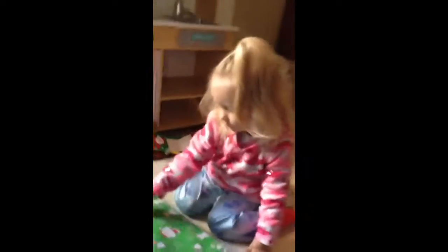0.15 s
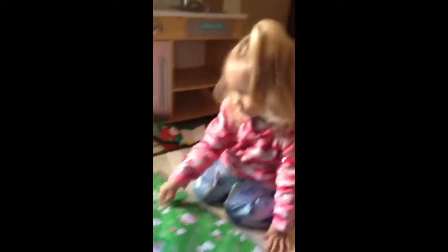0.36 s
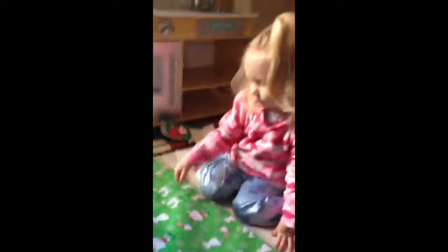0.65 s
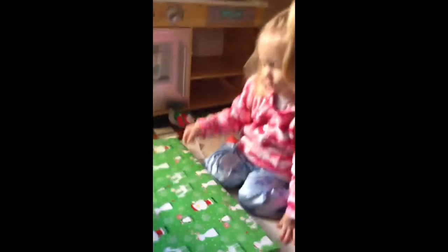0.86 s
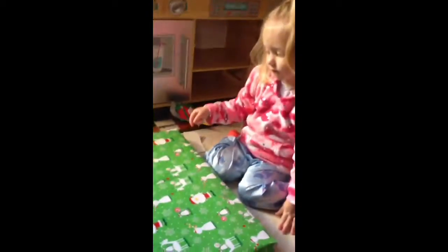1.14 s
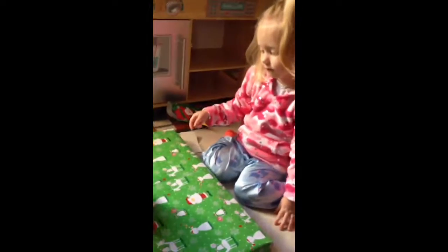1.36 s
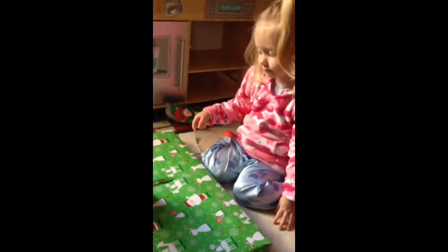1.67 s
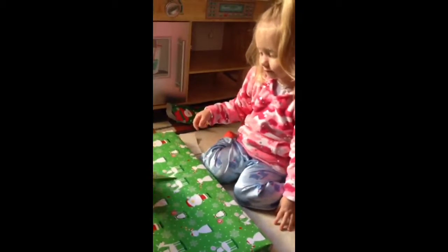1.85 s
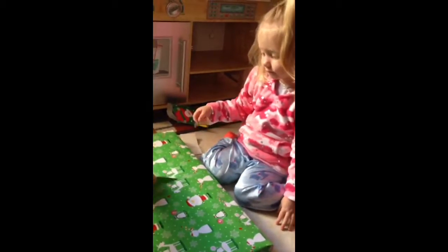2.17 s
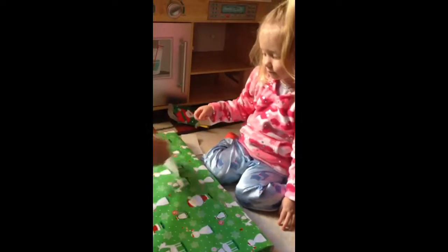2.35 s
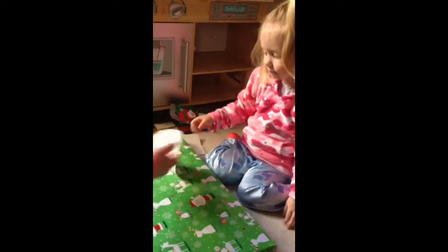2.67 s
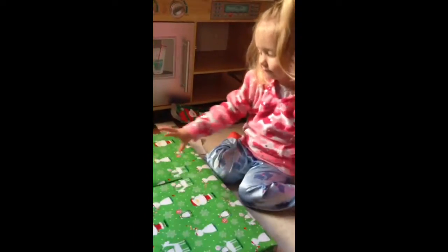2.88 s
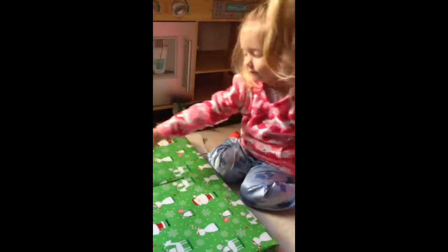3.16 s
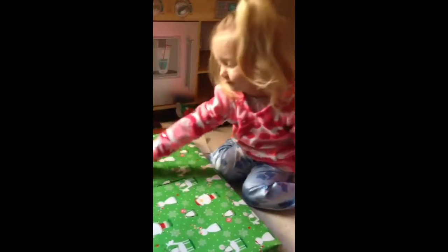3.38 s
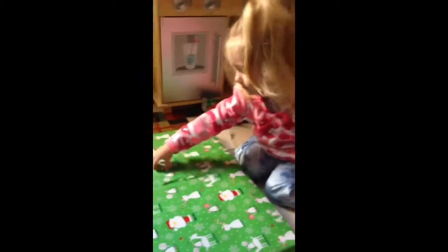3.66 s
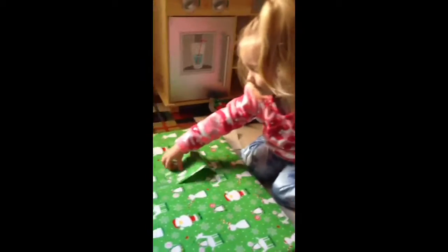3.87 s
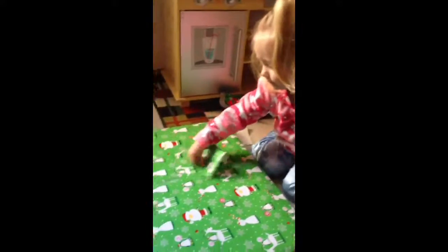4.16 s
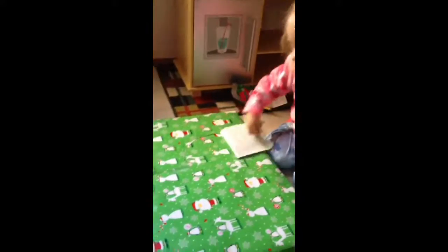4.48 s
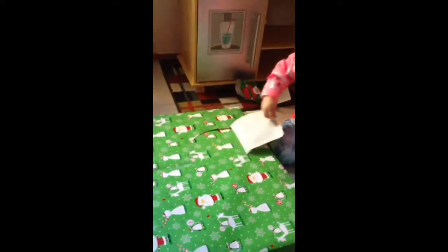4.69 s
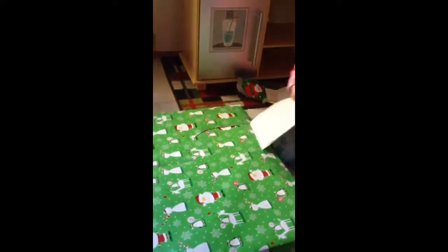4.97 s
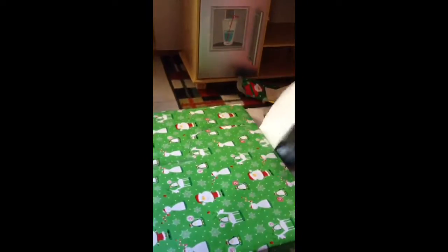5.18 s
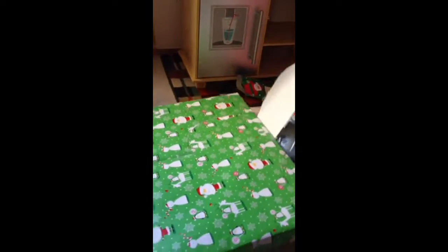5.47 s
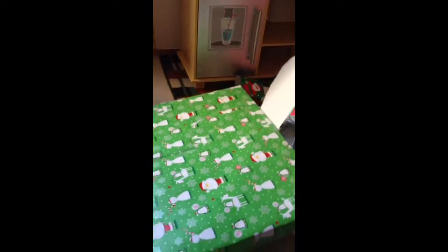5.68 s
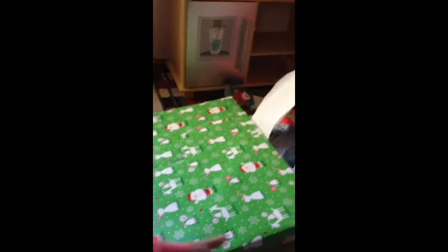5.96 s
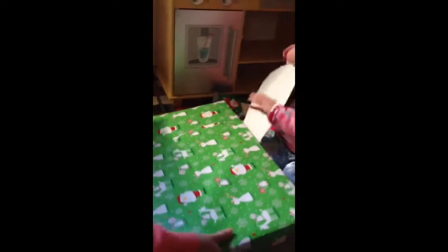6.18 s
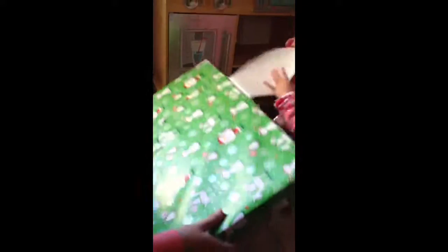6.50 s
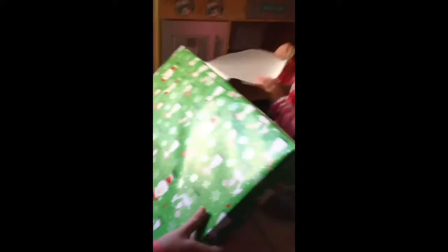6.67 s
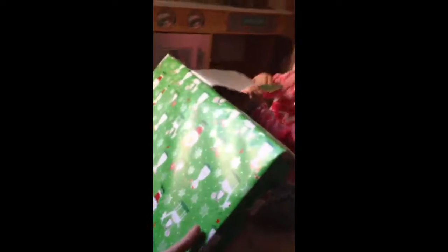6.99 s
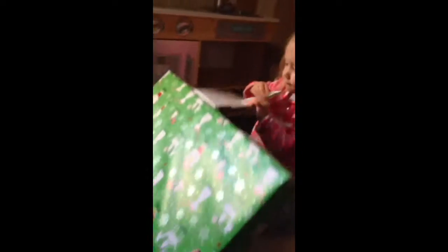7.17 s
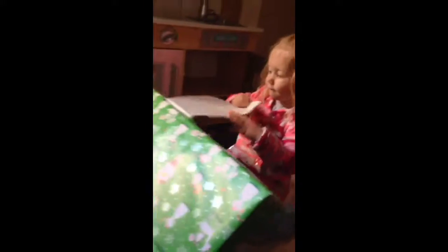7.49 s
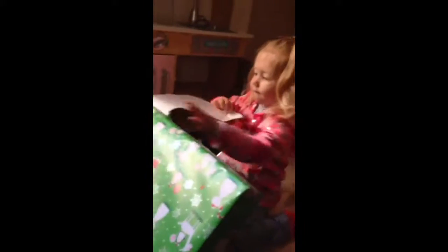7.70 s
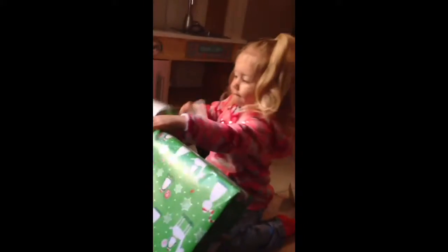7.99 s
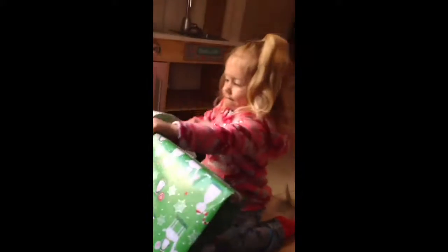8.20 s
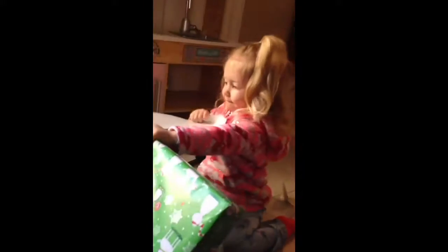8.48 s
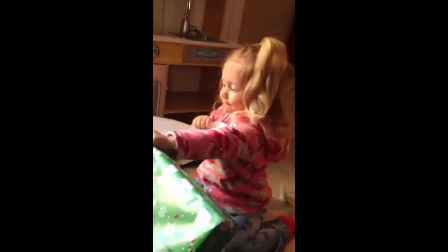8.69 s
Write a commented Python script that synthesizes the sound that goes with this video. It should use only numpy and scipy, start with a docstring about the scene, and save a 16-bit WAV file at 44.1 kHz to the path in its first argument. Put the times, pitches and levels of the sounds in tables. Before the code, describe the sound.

A close, dry mono sound in a small furnished room with faint steady noise. From 0 s, soft paper rustle and a few small creases; at about 0.8 s a hand shoves the box, a dull hollow boom with a knock and a papery scuff. Softer knock at 1.3 s. At 1.8 s a bump and a quick bright rip, a tiny tug or two near 2.15 s, then a second fuller rip from 2.2 to 2.5 s. Quiet brushing and faint taps from 2.7 to 4.3 s. At 4.4 s creases click, then the loudest event: a slow, jerky tear to about 5.1 s, with hard sharp snaps near 4.6, 4.9 and 5.0 s. A crease pops at 5.2 s and it calms. From 6 to 8.8 s the box tilts: irregular crinkling clicks, gentle sliding rustle and muffled low bumps, busier around 6.1-6.4, 7.1 and 8.3-8.7 s.

```python
"""Unwrapping a big gift box

Wrapping paper is pulled off a big cardboard box in a living room, close to a mono microphone.
Hands slide over the box: shaped grain noise makes its boom, the rustle and the hiss; ringing modes make soft knocks.
The sheet rips in three pulls, dense noise grains for breaking fibres, the last with hard snaps where it gives way.
Creases flip in decaying volleys of clicks, most of all as the loose flap crinkles while the box is tilted."""
import sys
import numpy as np
from scipy import signal
from scipy.fft import rfft, irfft, next_fast_len
from scipy.io import wavfile
from scipy.ndimage import uniform_filter1d, map_coordinates

SR = 44100
rng = np.random.default_rng(int(sys.argv[2]) if len(sys.argv) > 2 else 0)


def unload_wav(signal):
    """Save mono or channel-first audio to the path in sys.argv[1] as 16-bit WAV at rate SR, clipped to [-1, 1]."""
    wavfile.write(
        sys.argv[1],
        SR,
        np.round(np.clip(np.atleast_2d(signal).T, -1, 1) * 32767).astype(np.int16),
    )


N = 389844

# the taut sheet gives way in jerks: [t/s, length/s, peak level/dB]
JERK_TIMES = [(4.5723, 0.0072, -0.5), (4.617, .001, -8.5), (4.756, .001, -14.5), (4.8085, .001, -15),
              (4.8325, .001, -7), (4.8794, 0.039, -0.5), (4.9365, 0.0057, -5), (5.0016, 0.03, -2.5)]
JERK_FADE_DB = 4  # loss over the length of a jerk


def amp(db):
    """Decibels to gain."""
    return 10 ** (np.asarray(db) / 20)


def unit(x):
    """Scale to rms 1."""
    return x / np.sqrt(np.mean(x ** 2) + 1e-20)


def along(points, hz):
    """Read (Hz, value) points on a log frequency axis."""
    f, v = np.transpose(points)
    return np.interp(np.log(hz + 1), np.log(f + 1), v)


def filtered(x, response):
    """Multiply the spectrum of x by a response of frequency."""
    m = next_fast_len(N + SR // 2)
    return irfft(rfft(x, m) * response(np.fft.rfftfreq(m, 1 / SR)), m)[:N]


def coloured(x, spectrum):
    """Shape x by a spectrum and scale it to rms 1."""
    return unit(filtered(x, lambda hz: amp(along(spectrum, hz))))


def click(level_db, size=2048):
    """The sharpest causal (minimum-phase) pulse whose spectrum is level_db(Hz)."""
    cepstrum = irfft(np.log(amp(level_db(np.fft.rfftfreq(size, 1 / SR)))))
    cepstrum[1:size // 2] *= 2
    cepstrum[size // 2 + 1:] = 0
    return irfft(np.exp(rfft(cepstrum)))


def add(track, s, sound, db, measure=lambda x: np.abs(x).max()):
    """Mix a sound into the track at a time and a level (its peak, unless measured otherwise)."""
    start = max(round(s * SR), 0)
    part = track[start:start + len(sound)]
    part += (amp(db) * sound / measure(sound))[:len(part)]


def wobble(rate):
    """A smooth random curve, rate knots a second."""
    knots = rng.standard_normal(int(N * rate / SR) + 4)
    return map_coordinates(knots, [np.arange(N) * rate / SR])


def unsteady(depth_db, rate):
    """The uneven pressure of a hand, as a gain."""
    return amp(depth_db * wobble(rate))


def grains(rate, spread_db, clump_db, clump_rate):
    """Tiny impulses of uneven size, about rate a second, whose level wanders so that they seem to clump."""
    sizes = amp(spread_db * np.minimum(rng.exponential(size=N), 4)) * rng.choice([-1, 1], N)
    return sizes * (rng.random(N) < rate / SR) * amp(clump_db * wobble(clump_rate))


def facet(depth_db, count=45):
    """Random resonances of one facet of the sheet, as (Hz, dB) points."""
    return np.transpose([np.geomspace(300, 16000, count), depth_db * rng.standard_normal(count)])


def flexing(x, depth_db, size=384):
    """The bending sheet keeps changing its resonances, a few hundred Hz wide and some 30 ms long."""
    z = signal.stft(x, nperseg=size)[2]
    field = uniform_filter1d(rng.standard_normal(z.shape), size=3, axis=0)
    field = uniform_filter1d(field, size=7, axis=1)
    return signal.istft(z * amp(depth_db * unit(field)), nperseg=size)[1][:N]


def room_noise(level_db=-66.5):
    """The faint steady noise of the room, shaped from white noise."""
    # noise spectrum: [f/Hz, level/dB per Hz]
    quiet_spectrum = [(25, -24.5), (80, -18), (115, -3), (180, -4), (380, 4), (600, -3.5), (1500, -8.5),
                      (4000, -11), (8000, -15.5), (11000, -22), (15500, -17)]
    return amp(level_db) * coloured(rng.standard_normal(N), quiet_spectrum)


def room(x, wet_db, count=4, size=2205):
    """The direct sound plus the walls' answer, whose treble dies first; random tails take turns to vary its detail."""
    # reverberation of the room: [f/Hz, t60/s]
    decay_times = [(150, 0.36), (1000, 0.45), (3000, 0.31), (7000, 0.3), (15000, 0.26)]
    hz, t, z = signal.stft(rng.standard_normal((count, SR // 2)), SR, nperseg=256)
    decay = amp(-60 * t / along(decay_times, hz)[:, None])
    tails = signal.istft(z * decay, SR, nperseg=256)[1]
    tails /= np.linalg.norm(tails, axis=1, keepdims=True)
    tails = np.pad(tails, ((0, 0), (SR // 200, 0)))  # the answer comes 5 ms late
    # the tails take turns of size samples, crossfaded
    turn = np.arange(N) // size % count == np.arange(count)[:, None]
    shares = np.sqrt(np.abs(uniform_filter1d(turn.astype(float), size=size // 2, axis=1)))
    return x + amp(wet_db) * signal.oaconvolve(x * shares, tails, axes=1)[:, :N].sum(axis=0)


def knocking(vary_db=2, attack_s=0.0019, low_cut_hz=108):
    """A hand or knee bumps the box; its panels ring briefly, at new strengths each time."""
    # soft knocks on the box: [t/s, peak level before the low cut/dB]
    knocks = [(0.564, -44), (.812, -27.5), (1.294, -33), (1.805, -34), (3.406, -46), (3.454, -44.5),
              (3.57, -47), (3.683, -43), (5.404, -45.5), (6.056, -47), (7.218, -40.5), (8.284, -38),
              (8.651, -37)]
    # cardboard panel modes: [f/Hz, level/dB, t60/s]
    panel_modes = [(171.4, 0.5, 0.11), (219.6, 0, 0.13), (272, -4, 0.064), (354, -1, 0.13),
                   (453.5, -2, 0.12), (495, -8, 0.11), (658, -13, 0.071)]
    track, t = np.zeros(N), np.arange(SR // 4) / SR
    for s, db in knocks:
        ring = np.zeros(len(t))
        for hz, level, t60 in panel_modes:
            decay = amp(level + rng.normal(0, vary_db) - 60 * t / t60)
            ring += decay * np.sin(2 * np.pi * hz * t + rng.uniform(0, 2 * np.pi))
        add(track, s, ring * (1 - np.exp(-t / attack_s)), db)
    # the box radiates little bass
    return signal.sosfilt(signal.butter(2, low_cut_hz, "high", fs=SR, output="sos"), track)


def stroke_gains(swell_db=20):
    """Boom, rustle and hiss of all strokes: each climbs swell_db in its rise and sinks as far in its fall."""
    # strokes of hands and flap over the box:
    # [t at the fastest/s, rise/s, fall/s, box boom level/dB, rustle level/dB, hiss level/dB]
    stroke_rows = [(.115, 0.21, 0.32, -52.5, -55, -60.5), (0.579, 0.15, 0.19, -50, -58.5, -66),
                   (.8, 0.19, 0.092, -46, -44.5, -42.5), (0.823, 0.059, 0.13, -29.5, -32.5, -51),
                   (1.38, 0.4, 0.16, -52, -59, -63.5), (1.64, .3, 0.51, -54.5, -60, -66.5),
                   (1.812, 0.032, 0.063, -36, -55, -63), (2.58, 0.13, 0.12, -55.5, -58, -72),
                   (2.719, 0.12, 0.059, -55.5, -69, -66), (2.97, 0.78, 0.37, -77, -83, -67),
                   (3.41, 0.12, 0.18, -56.5, -64, -63), (3.619, 0.081, 0.24, -57, -54, -54),
                   (3.77, 0.15, 0.12, -77, -77, -58.5), (3.89, 0.12, .12, -67, -71, -56),
                   (4.085, 0.093, 0.11, -64, -59.5, -60), (4.255, 0.12, 0.15, -61.5, -61.5, -50.5),
                   (5.224, 0.06, 0.38, -59.5, -56, -57), (5.6, .4, 0.4, -60.5, -66.5, -64.5),
                   (5.825, .03, 0.094, -58.5, -63, -64), (6.15, 0.18, 0.37, -50, -50, -53),
                   (6.39, 0.22, 0.37, -46, -49, -54.5), (6.78, .22, 0.35, -57.5, -55, -57.5),
                   (7.01, 0.14, 0.22, -55.5, -55.5, -58), (7.16, 0.17, 1, -50.5, -52, -54.5),
                   (7.42, 0.13, 0.16, -61, -58, -68), (7.82, .17, 0.19, -54, -52.5, -63),
                   (7.94, 0.24, 0.24, -56.5, -52.5, -53), (8.17, 0.24, 0.66, -56.5, -56.5, -61.5),
                   (8.299, 0.086, 0.18, -47.5, -48.5, -49), (8.52, 0.091, 0.13, -48.5, -45.5, -49),
                   (8.664, 0.2, 0.23, -50, -48, -50)]
    t, power = np.arange(N) / SR, np.zeros((3, N))
    for s, rise, fall, *levels_db in stroke_rows:
        away = np.maximum((s - t) / rise, (t - s) / fall)
        near = away < 3
        power[:, near] += np.outer(amp(levels_db), amp(-swell_db * away[near])) ** 2
    return np.sqrt(power)


def sliding(strokes, whump_db=22, steepness=1.81):
    """Stick and slip of paper on cardboard: the box booms, the sheet rustles, its surface hisses."""
    # spectrum of the box boom: [f/Hz, level/dB per Hz]
    boom_spectrum = [(30, -59), (60, -32), (100, -20), (150, -4.5), (250, 1.5), (450, -0.5), (600, -8.5),
                     (720, -5.5), (1100, -14), (2500, -43)]
    # spectrum of the rustling sheet: [f/Hz, level/dB per Hz]
    rustle_spectrum = [(60, -62.5), (500, 6.5), (800, 1.5), (1400, 3.5), (2200, 0), (4400, -5.5),
                       (5500, -18), (10000, -37)]
    # spectrum of the paper surface: [f/Hz, level/dB per Hz]
    hiss_spectrum = [(200, -73), (1500, -11), (3500, -1.5), (4800, -2), (7500, -2), (10000, -10.5),
                     (15500, -15.5)]
    # spectrum of the box's upper panel modes: [f/Hz, level/dB per Hz]
    whump_spectrum = [(200, -27), (560, -14), (680, 3), (820, -6), (950, -3), (1150, -9.5), (1700, -13),
                      (3000, -44)]
    boom, rustle, hiss = strokes
    drag = grains(rate=6000, spread_db=2.5, clump_db=3.24, clump_rate=90)
    slips = flexing(grains(rate=2600, spread_db=2.5, clump_db=1.5, clump_rate=130), depth_db=5.5)
    fine = flexing(grains(rate=5500, spread_db=2.5, clump_db=1.0, clump_rate=91), depth_db=2.0)
    # only a hard shove wakes the upper panel modes
    whump = amp(whump_db) * boom ** steepness * coloured(rng.standard_normal(N), whump_spectrum)
    friction = boom * coloured(drag, boom_spectrum)
    friction += rustle * coloured(slips, rustle_spectrum)
    friction += hiss * coloured(fine, hiss_spectrum)
    return whump + unsteady(depth_db=1.35, rate=27) * friction


def small_creases(rustle, count=300, per_s=16, pop_db=8.5, edge_db=-8.5):
    """Little creases flip at random moments, louder the harder the sheet is handled."""
    start, chance = rng.integers(N, size=count), rng.random(count)
    rustle_db = 20 * np.log10(rustle[start] + 1e-9)
    db = rustle_db - 0.5 + rng.uniform(-7.0, 4.325, count)
    flips = chance < per_s * N / SR / count
    return [(i / SR, level, pop_db, edge_db) for i, level in zip(start[flips], db[flips])]


def crinkling(rustle, buckle_t60=.019, settle_db=-25, settle_t60=0.088, ragged_db=3.2,
              rebound_s=.011, rebound_db=-10):
    """A crease flips in a quick volley of clicks, rebounds and settles; wide folds pop low, tight ones are bright."""
    # large creases buckling: [t/s, rms level as if over 10 ms/dB, relative low pop/dB, relative bright edge/dB]
    large_creases = [(0.104, -56, 10, -7), (0.341, -51.5, 9, -11), (0.56, -51.5, 6, -1),
                     (0.7845, -34, -1, -8), (1.2975, -46.5, 17, -7), (1.7715, -40, 3.5, 12),
                     (1.7872, -30.5, -8.5, 0), (1.8126, -27.5, 9, 3.5), (1.875, -31.5, -1, -3),
                     (2.158, -46, -8, 1.5), (2.189, -34, -17, 2), (2.712, -53, 10, -1), (3.601, -50, 4, -4),
                     (3.697, -49.0, -3, -11.5), (3.746, -53, -10, 5.5), (4.1393, -56, -8, 11),
                     (4.372, -32.5, -4, -7), (4.4085, -30, -7, 1), (4.4356, -36.0, -6, 8.5),
                     (4.6548, -36, -6, 6), (4.7002, -36.5, -6.5, 1), (5.203, -34.0, 9.5, 4),
                     (5.3407, -49.0, 4.5, -6), (5.4051, -44.5, 15, -1.5), (5.487, -50.0, -5, 12.5),
                     (5.822, -57, 3, -15), (5.9634, -53.0, 4, 12), (6.0552, -50, 9, 1),
                     (6.0893, -41.5, -3, -8), (6.1307, -33.5, 4, -2.5), (6.211, -49, -3, -16),
                     (6.33, -32, 3.5, -16), (6.3836, -44, 16, -7), (6.418, -40.0, -10, -6),
                     (6.5206, -43.0, 5, -14), (6.701, -51.5, 18, -11), (6.7592, -40.0, -4, 0),
                     (6.777, -46, -4, 0), (6.9633, -51.5, 3.5, -10), (7.1104, -41.5, -15, -11),
                     (7.1195, -44, -6, -6), (7.146, -38.5, 1, -7), (7.157, -43, -2, -7),
                     (7.2223, -41.5, 10, -15), (7.3508, -40.5, -10, -15), (7.5079, -44, 7, -3),
                     (7.7196, -51, 8, -20), (7.7865, -47, -2, 3), (7.9246, -43.5, -3, 6.5),
                     (8.1592, -49.5, 11.5, -14), (8.2882, -30.5, -8, -8), (8.2981, -46.5, -2, 0.5),
                     (8.4077, -46.5, 12, -9.5), (8.4836, -46.5, 11, -15.5), (8.6009, -41.5, 11, -5.5),
                     (8.6507, -35.5, 6, 10.5), (8.6808, -37.5, 9, -3)]
    # spectrum of a crease: [f/Hz, level/dB per Hz]
    crease_spectrum = [(30, -48.5), (100, -20.5), (220, -1.5), (400, -0.5), (1500, -2.5), (4400, 0.5),
                       (5500, -4), (7500, -1.5), (10000, -13.5), (15500, -18.5)]
    track, t = np.zeros(N), np.arange(SR // 16) / SR
    for s, db, pop_db, edge_db in list(large_creases) + small_creases(rustle):
        tilt = [(200, min(pop_db, pop_db / 2)), (600, pop_db), (2000, 0), (5000, 0), (9000, edge_db)]
        resonances = facet(depth_db=2.0)
        volley = rng.standard_normal(len(t)) * amp(ragged_db * rng.standard_normal(len(t)))
        # the fold beside the crease flips after it
        later = t - rebound_s * rng.uniform(.5, 2)
        rebound = (later > 0) * amp(rebound_db - 60 * np.abs(later) / buckle_t60)
        volley *= amp(-60 * t / buckle_t60) + rebound + amp(settle_db - 60 * t / settle_t60)
        volley[0] = 3.4  # a strong first flip
        flip = click(lambda hz: along(crease_spectrum, hz) + along(tilt, hz) + along(resonances, hz))
        crease = signal.fftconvolve(volley, flip)
        add(track, s, crease, db, measure=lambda x: np.sqrt(np.sum(x ** 2) / (SR // 100)))
    return track


def pull_force(rows):
    """A (s, dB) curve as a gain that starts and stops within a few ms."""
    s, db = np.transpose(rows)
    curve_db = np.interp(np.arange(N) / SR, s, db, left=-150, right=-150)
    return np.abs(uniform_filter1d(amp(curve_db), size=200))


def ripping(firm_pull_db=-31.5, jerk_fibres_db=-27.5):
    """Fibres break by the thousand along the tear, most of all in a jerk; they shake the sheet and the box under it."""
    # first quick pull, two short tugs, second quick pull; force as fibre level: curves of [t/s, level/dB]
    quick_pulls = [
        [(1.784, -38.5), (1.81, -23.5), (1.848, -34.5), (1.874, -31), (1.926, -48.5), (2.078, -58.5),
         (2.09, -55)],
        [(2.09, -60), (2.12, -43), (2.14, -57), (2.162, -38.5), (2.18, -47.5), (2.19, -44), (2.2, -45)],
        [(2.2, -47), (2.214, -47), (2.224, -34), (2.312, -27), (2.41, -35.5), (2.62, -74)],
    ]
    # force of the long slow pull, before its jerks: [t/s, level/dB]
    slow_pull = [(4.41, -54.5), (4.445, -39.5), (4.5, -50), (4.54, -41), (4.571, -49.5), (4.582, -34),
                 (4.72, -39), (4.85, -31.5), (4.93, -29.5), (4.99, -48), (5.02, -27.5), (5.06, -32.5),
                 (5.11, -52.5), (5.17, -57)]
    # spectrum of the box under the tear: [f/Hz, level/dB per Hz]
    rip_boom_spectrum = [(30, -46), (60, -44), (150, -4), (290, -4), (350, 2.5), (450, 2), (600, -12.5),
                         (1200, -30)]
    # spectrum of the fluttering sheet: [f/Hz, level/dB per Hz]
    flutter_spectrum = [(60, -62), (400, -23), (750, -0.5), (1150, 2.5), (1500, 0), (2000, 5.5),
                        (3000, -7.5), (6000, -45)]
    # spectrum of breaking fibres: [f/Hz, level/dB per Hz]
    fibre_spectrum = [(100, -66), (1200, -16), (2000, -4.5), (2800, -1), (4200, 1.5), (5500, -4),
                      (7500, -4), (10000, -12.5), (15500, -15.5)]
    quick, slow = sum(pull_force(rows) for rows in quick_pulls), pull_force(slow_pull)
    for s, length, db in JERK_TIMES:
        jerk = pull_force([(s, db), (s + length, db - JERK_FADE_DB)])
        slow = np.hypot(slow, amp(jerk_fibres_db) * jerk)
    fine = flexing(grains(rate=14000, spread_db=2.5, clump_db=1.16, clump_rate=270), depth_db=2.5)
    coarse = flexing(grains(rate=2200, spread_db=2.0, clump_db=3.5, clump_rate=200), depth_db=3.0)
    shake = flexing(grains(rate=7000, spread_db=3.0, clump_db=1.1, clump_rate=120), depth_db=2.0)
    force = (quick + slow) / amp(firm_pull_db)
    # level at a firm pull; the exponent is dB gained per dB of force
    boom = amp(-45.5) * force ** 0.64 * coloured(shake, rip_boom_spectrum)
    flutter = amp(-42.5) * force ** 0.75 * coloured(shake, flutter_spectrum)
    fibres = quick * coloured(fine, fibre_spectrum) + slow * coloured(coarse, fibre_spectrum)
    return boom + flutter + fibres


def snapping(ring_db=-29, ring_t60=0.073, gap_s=.0022, slowing=1.05, uneven=.4, scatter_db=7, count=24):
    """A jerk is a slowing run of sharp cracks, the first the hardest, each followed by a short shiver of the sheet."""
    # spectrum of a crack: [f/Hz, level/dB per Hz]
    snap_spectrum = [(30, -61.5), (140, -31), (380, -12.5), (600, -26), (900, -20), (1900, -21), (2700, -6),
                     (4400, 0.5), (5700, -6), (7200, -4.5), (10000, -14), (15500, -20.5)]
    track, t, order = np.zeros(N), np.arange(SR // 20) / SR, np.arange(count)
    for s, length, db in JERK_TIMES:
        gaps = gap_s * slowing ** order * np.exp(uneven * rng.standard_normal(count))
        losses_db = scatter_db * rng.random(count) ** 2 * (order > 0)
        for delay, loss_db in zip(np.cumsum(gaps) - gaps[0], losses_db):
            if delay >= length:
                break
            resonances = facet(depth_db=3.0)
            shiver = amp(ring_db - 60 * t / ring_t60) * rng.standard_normal(len(t))
            shiver[0] = 1  # the break itself
            crack = click(lambda hz: along(snap_spectrum, hz) + along(resonances, hz))
            level_db = db - loss_db - JERK_FADE_DB * delay / length
            add(track, s + delay, signal.fftconvolve(shiver, crack), level_db)
    return track


def scene():
    """Paper and box in the room, over its faint steady noise."""
    strokes = stroke_gains()
    box = room(knocking(), wet_db=-7.0) + room(sliding(strokes), wet_db=-11.5)
    creases = room(crinkling(rustle=strokes[1]), wet_db=-8)
    tear = room(ripping() + snapping(), wet_db=-9.5)
    mono = room_noise() + box + creases + tear
    return np.array([mono, mono])


def record(dry, ceiling=0.71, hardness=6, low_cut_hz=42, top_hz=15600):
    """The recorder rounds off the tallest cracks, thins the deepest bass and keeps nothing above its band limit."""
    held = dry / (1 + np.abs(dry / ceiling) ** hardness) ** (1 / hardness)
    held = signal.sosfilt(signal.butter(2, low_cut_hz, "high", fs=SR, output="sos"), held)
    return np.array([filtered(channel, lambda hz: hz < top_hz) for channel in held])


dry = scene()
out = record(dry)
unload_wav(out)
```